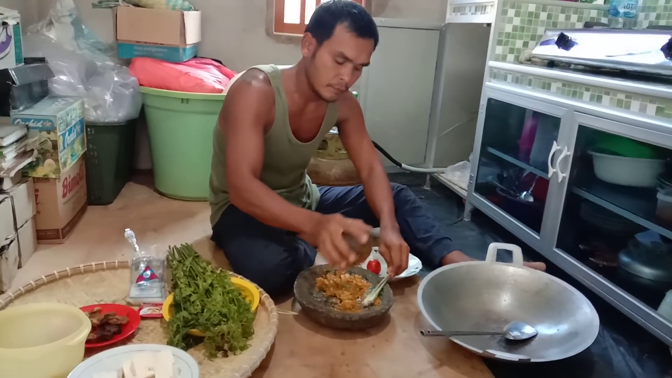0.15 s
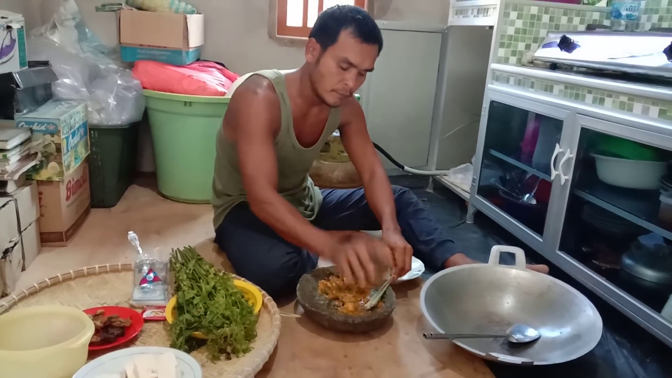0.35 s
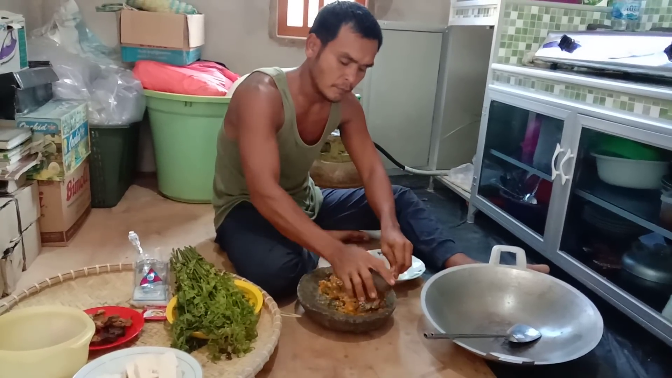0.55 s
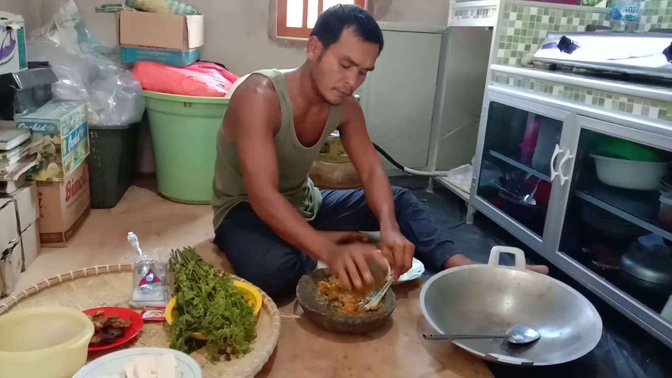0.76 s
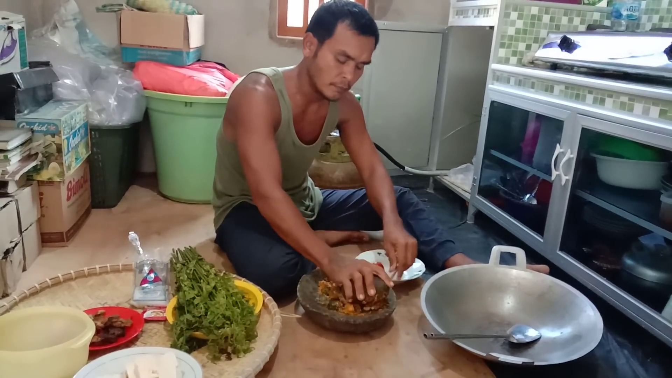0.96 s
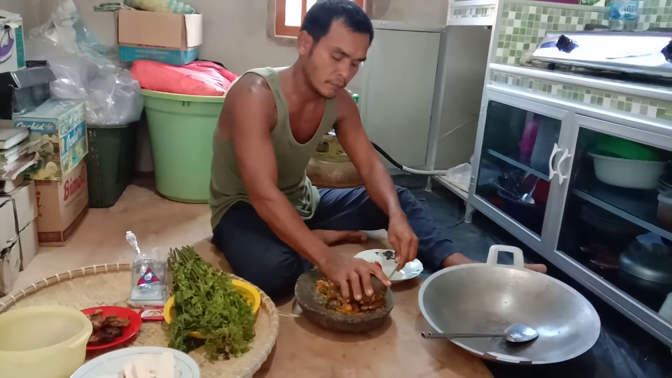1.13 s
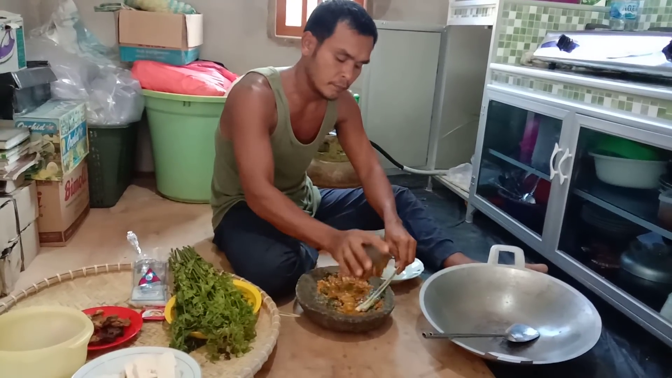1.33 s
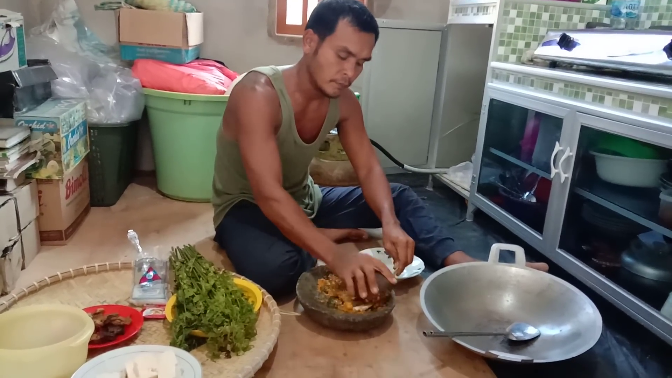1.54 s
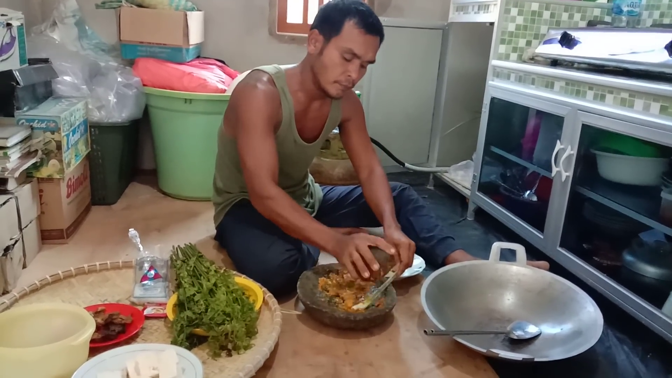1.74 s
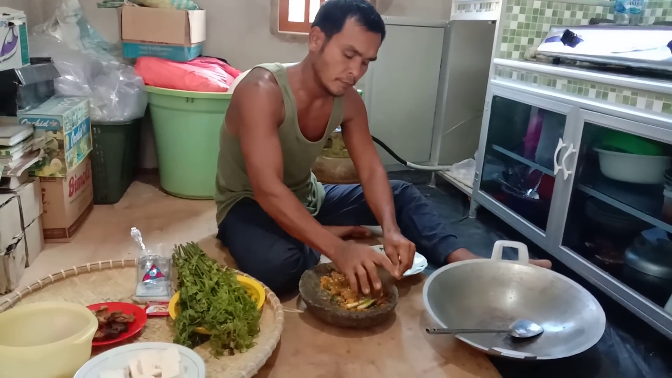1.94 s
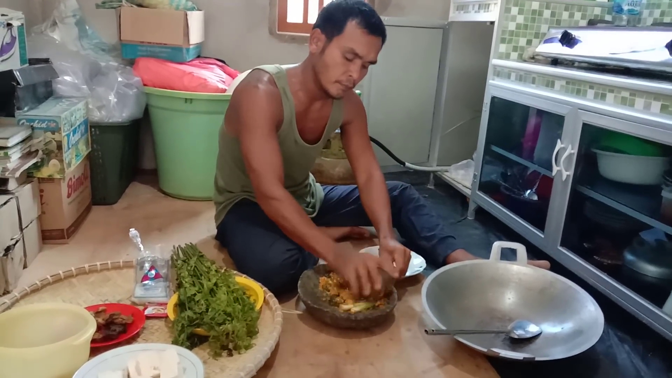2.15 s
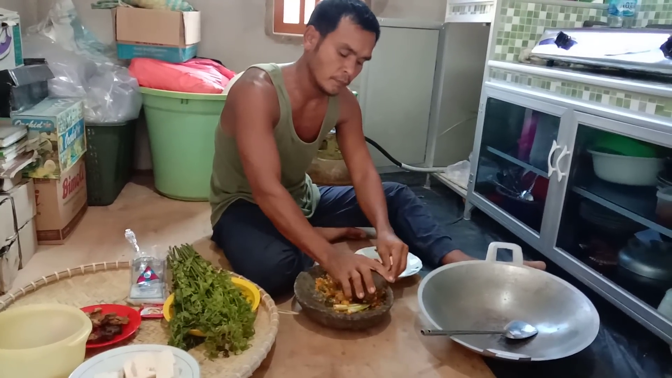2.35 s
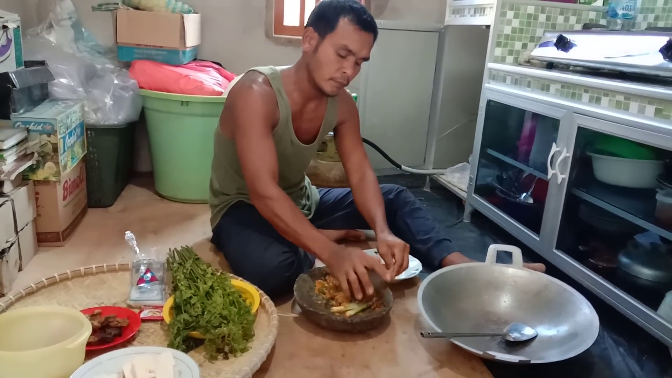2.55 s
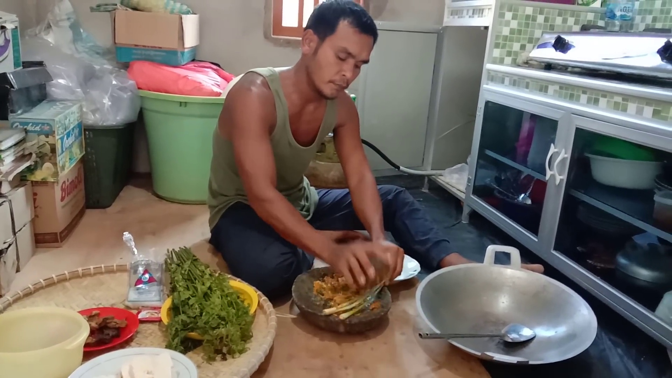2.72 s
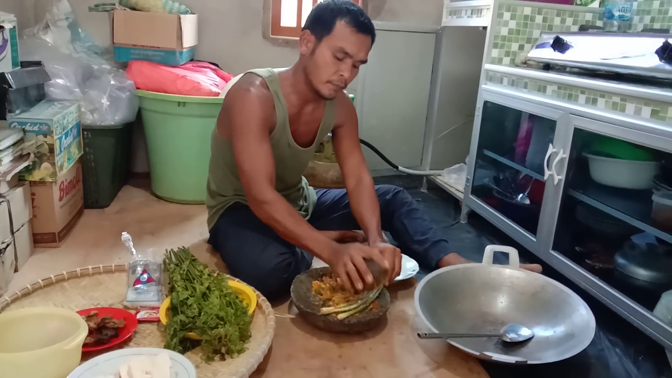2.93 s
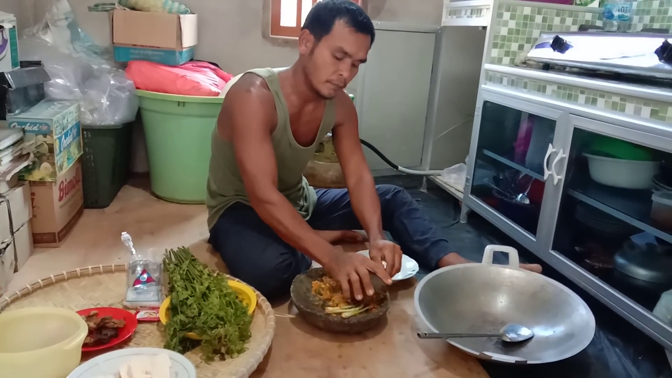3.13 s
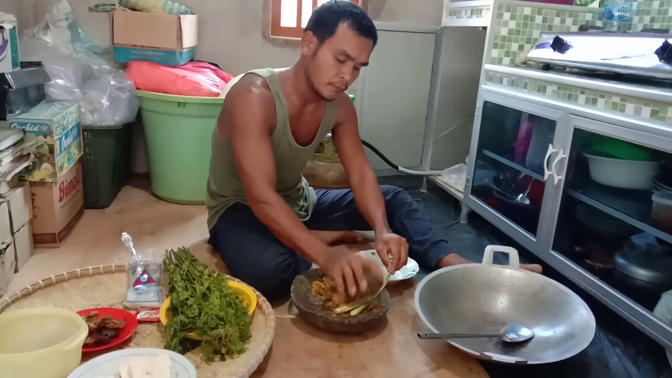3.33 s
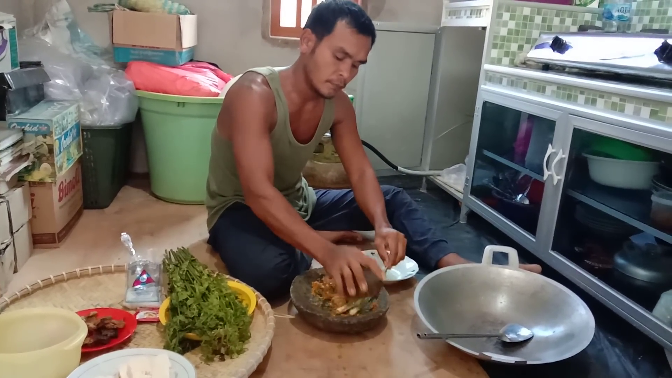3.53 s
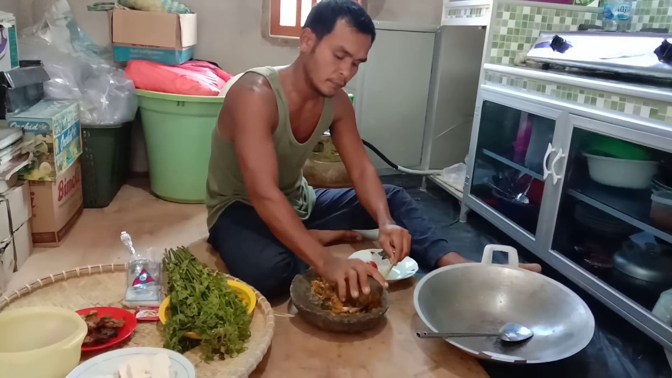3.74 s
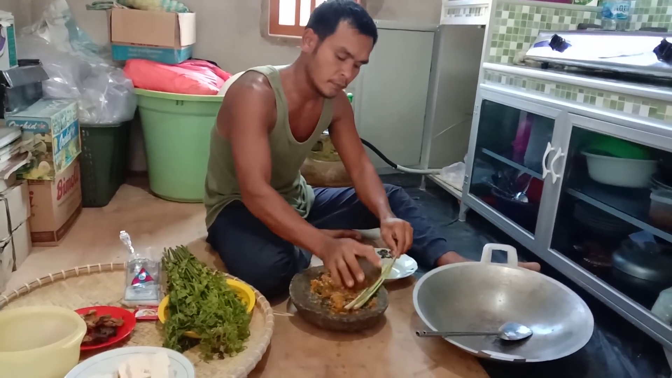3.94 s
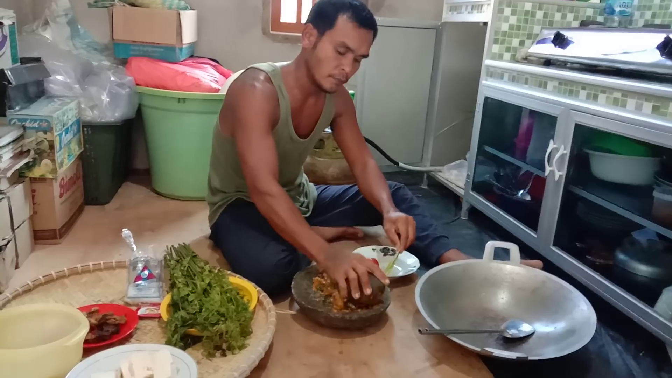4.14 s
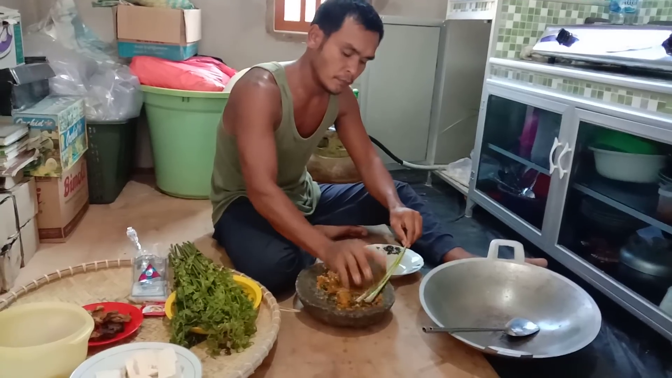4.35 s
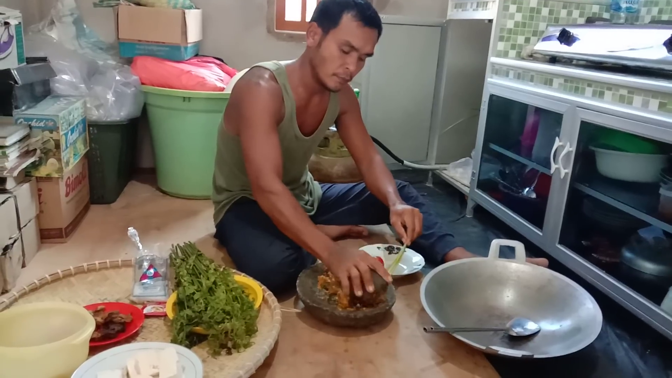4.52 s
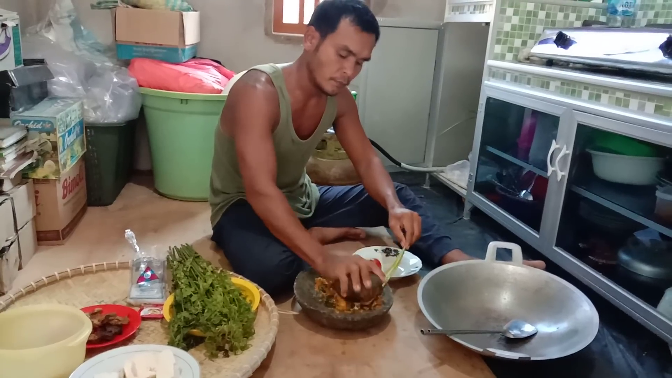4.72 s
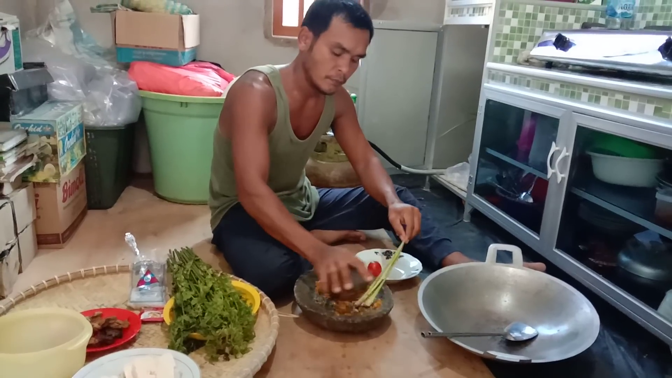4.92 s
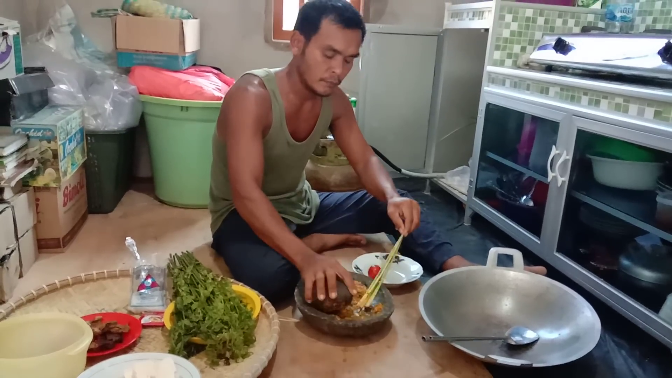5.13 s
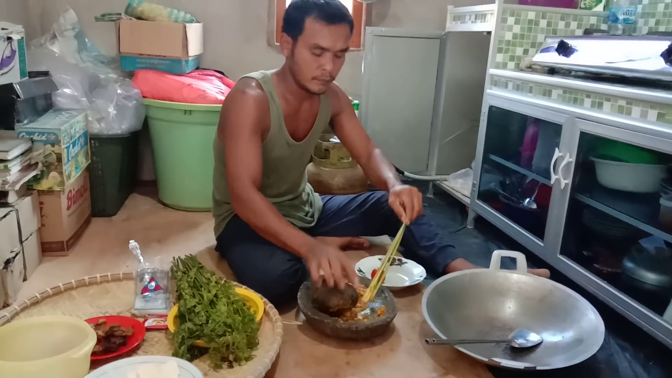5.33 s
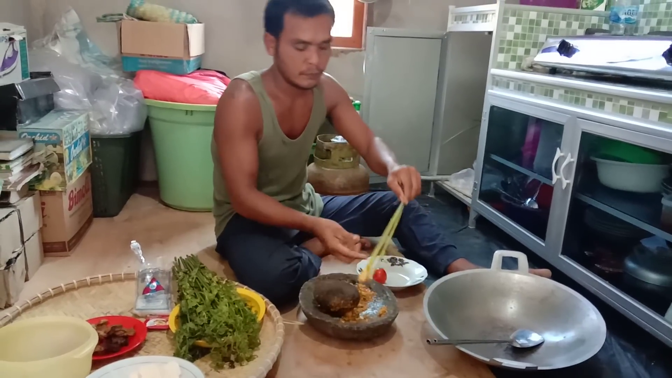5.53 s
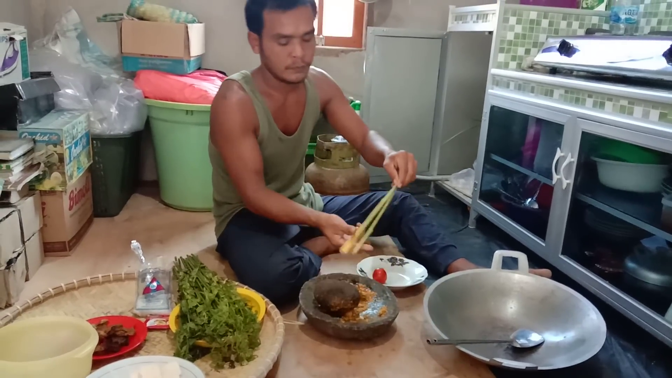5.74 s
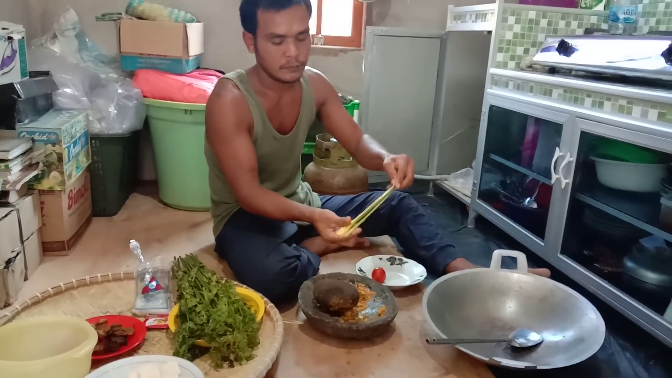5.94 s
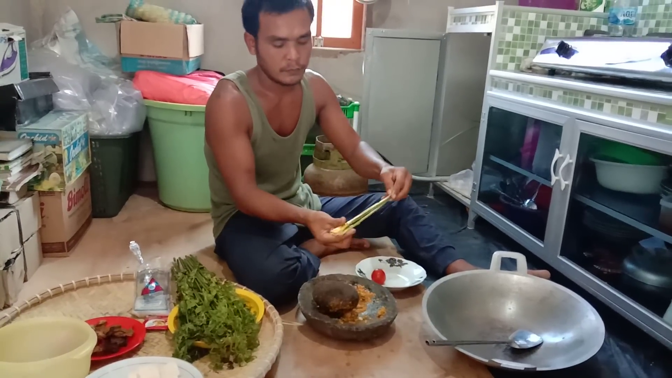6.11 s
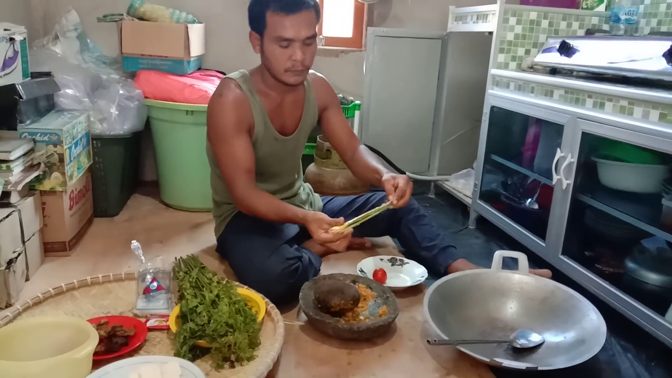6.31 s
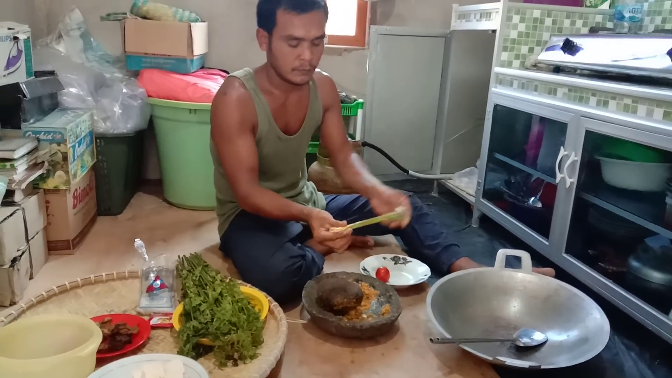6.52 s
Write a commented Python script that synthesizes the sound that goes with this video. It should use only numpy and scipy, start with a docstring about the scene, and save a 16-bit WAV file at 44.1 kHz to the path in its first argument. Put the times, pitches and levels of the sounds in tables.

```python
"""In a hard-walled kitchen, a stone pestle pounds stalks and wet spice paste in a stone mortar on the floor.
Each blow is shaped noise: a low thud, a ring through the stone's resonances, a crack of fibres and a fine spray.
Rebounds tap and a skid grinds, the pestle is laid down, grains of noise make hands rustle, snap and squeak.
Decaying noise bands form the room tail, low resonances the floor's rumble, steady noise the room tone.
A small microphone with gain control flattens the start of every tail."""
import sys
import numpy as np
from scipy import signal
from scipy.fft import rfft, irfft
from scipy.io import wavfile
from scipy.ndimage import uniform_filter1d

SR = 44100
rng = np.random.default_rng(int(sys.argv[2]) if len(sys.argv) > 2 else 0)


def field_ratio(decibels):
    """Amplitude ratio for a level in dB (20 dB per decade); scalars and array-likes work."""
    return 10 ** (np.asarray(decibels, dtype=float) / 20)


def output_pcm(signal):
    """Save a mono or channel-first signal as 16-bit PCM at the path in sys.argv[1].

    Samples are clipped to [-1, 1] before scaling.
    """
    pcm = np.clip(np.atleast_2d(signal).T, -1, 1) * 32767
    wavfile.write(sys.argv[1], SR, np.round(pcm).astype(np.int16))


N = 294265  # length [samples]


def rms_one(x):
    """Normalisation: scales a signal to unit rms."""
    return x / np.sqrt(np.mean(x ** 2) + 1e-20)


def at_hz(points, hz):
    """Logarithmic frequency axis: interpolates a table of (frequency, value) along it."""
    table_hz, values = np.array(points).T
    return np.interp(np.log(hz), np.log(table_hz), values)


def band(x, low_hz, high_hz):
    """Band-pass filtering: a Butterworth filter keeps one part of the spectrum."""
    return signal.sosfilt(signal.butter(2, [low_hz, high_hz], "band", fs=SR, output="sos"), x)


def colour(x, points, size=4096):
    """Minimum phase: folding the cepstrum gives the causal filter of a given magnitude response."""
    hz = np.arange(size // 2 + 1) * SR / size + 1  # the offset avoids log(0)
    cepstrum = irfft(np.log(field_ratio(at_hz(points, hz))))
    cepstrum[1:size // 2] *= 2
    cepstrum[size // 2 + 1:] = 0
    impulse_response = irfft(np.exp(rfft(cepstrum)))
    return signal.fftconvolve(x, impulse_response)[:N]


def resonate(x, modes):
    """Modal superposition: two-pole resonators in parallel, with alternating signs."""
    out = 0
    for k, (hz, width_hz, level_db) in enumerate(modes):
        r = np.exp(-np.pi * width_hz / SR)  # pole radius: a wider mode decays faster
        a = [1, -2 * r * np.cos(2 * np.pi * hz / SR), r * r]
        b = [(1 - r * r) / 2, 0, (r * r - 1) / 2]
        out = out + (-1) ** k * field_ratio(level_db) * signal.lfilter(b, a, x + 1e-18)
    return out


def clicks(times, levels_db):
    """Impulsive excitation: one single-sample impulse at each time."""
    out = np.zeros(N)
    out[(np.asarray(times) * SR).astype(int)] = field_ratio(levels_db)
    return out


def bursts(times, levels_db, rise_s, fall_s):
    """Rough contact: noise that swells and falls exponentially, with the energy of an impulse."""
    t = np.arange(2000) / SR
    shape = np.exp(-t / fall_s) * (1 - np.exp(-t / rise_s)) ** 2
    shape = shape / np.linalg.norm(shape)
    return signal.fftconvolve(clicks(times, levels_db), shape)[:N] * rng.standard_normal(N)


def contact(times, levels_db, rise_s, fall_s, sharp_db=-12):
    """Direct and radiated sound: row 0 is a rough burst with a sharp edge, row 1 impulses for the room."""
    edge = field_ratio(sharp_db) * clicks(np.asarray(times) + rise_s, levels_db)
    return np.array([bursts(times, levels_db, rise_s, fall_s) + edge, clicks(times, levels_db)])


# Blows of the pestle; the four parts are relative to the blow: (time [s], level of the blow [dB],
# thud [dB], stone ring [dB], crack [dB], spray [dB])
BLOWS = [(0.365, -6, -12, -14.5, -14, -39), (0.426, -15, -13.5, -17, -15.5, -31),
         (0.777, -12, -7, -9, -13.5, -33.5), (1.43, -7.5, -11.5, -16.5, -16, -35.5),
         (1.796, -11.5, -11, -14, -9.5, -21.5), (2.125, -5.5, -17.5, -27, -18.5, -24),
         (2.735, -9, -14.5, -21, -14, -23), (3.041, -6, -21, -2, -23, -34.5),
         (3.364, -10, -14.5, -14, -18, -32.5), (3.69, -10.5, -10.5, -11, -16.5, -48),
         (4.045, -19, -4, -6.5, -11, -14.5), (4.386, -14.5, -7.5, -9.5, -15.5, -22),
         (4.708, -7.5, -15, -18, -23.5, -33)]
# Resonances of the mortar: (frequency [Hz], width [Hz], level [dB])
STONE_MODES = [(790, 130, -10), (1228, 40, 0), (1270, 40, 0), (1250, 10, -5), (1560, 150, -11),
               (2030, 220, -13), (2380, 70, -6), (2750, 110, -10), (3190, 120, -17), (3990, 60, -15),
               (4390, 70, -22)]
# Resonances of the boards under the mortar: (frequency [Hz], width [Hz], level [dB])
FLOOR_MODES = [(104, 26.7, -14), (216.2, 31, -4.5), (232.7, 25, -2), (377.7, 15, 2.5), (671, 18, -4.5)]


def pestle():
    """Impact excitation: soft paste gives the thud, bare stone the ring, breaking fibres crack and spray."""
    s, peak_db, thud_db, ring_db, crack_db, spray_db = np.transpose(BLOWS)
    push = contact(s, peak_db + thud_db, 0.0006, 0.0075)
    thud = field_ratio(37.5) * band(push, 110, 1062) + field_ratio(39.0) * resonate(push, FLOOR_MODES)

    knock = contact(s, peak_db + ring_db, 0.0024, 0.0033, sharp_db=-4.5)
    ring = field_ratio(47.5) * resonate(band(knock, 710, 1900), STONE_MODES)
    ring = ring + field_ratio(29.5) * band(knock, 625, 4400)

    snap = contact(s, peak_db + crack_db, 0.00022, 0.0028)
    crack = field_ratio(34.0) * band(snap, 2210, 8170) * field_ratio([[-1.5], [0]])

    spit = contact(s, peak_db + spray_db, 0.001, 0.0035)
    spray = field_ratio(30.5) * band(spit, 7000, SR * 3 / 8) * field_ratio([[-6], [0]])
    spray = spray + field_ratio(6.5) * band(spray, 7800, 9100)  # wet paste spits most here

    # the stalks start to crush a moment before stone meets stone; direct sound only
    crush = field_ratio(20) * band(bursts(s - .007, peak_db + thud_db, 0.0077, 0.0072), 1500, 7600)
    return thud + ring - crack + spray + crush * [[1], [0]]


# The pestle is dropped into the paste: (time [s], level [dB])
LAID_DOWN = [(5.061, -16.5)]
# Resonances of its duller knock: (frequency [Hz], width [Hz], level [dB])
LAID_MODES = [(845, 1050, -15), (1410, 293, 5.5), (2000, 200, -29), (2220, 190, -34), (3020, 210, -11.5),
              (4370, 130, -19), (1500, 13, 2)]


def laid_down():
    """Damped impact: the pestle dropped into paste excites mostly broad resonances."""
    s, level_db = np.transpose(LAID_DOWN)
    drop = contact(s, level_db, 0.00085, 0.0063)
    return field_ratio(34.5) * resonate(band(drop, 390, 4540), LAID_MODES) + field_ratio(14) * band(drop, 100, 1000)


# The mortar rocks and taps the floor: (time [s], level [dB])
REBOUNDS = [(0.468, -18.5), (1.514, -22.5), (1.84, -13.5), (2.177, -11.5), (2.21, -22.5), (2.756, -16.5),
            (2.785, -9), (2.818, -23)]


def rebounds():
    """Secondary impacts: short dry taps of the rocking bowl excite the stone's resonances."""
    s, level_db = np.transpose(REBOUNDS)
    tap = contact(s, level_db, 0.00089, 0.0014) * field_ratio([[1.5], [-8]])
    tap = band(tap, 640, 3100)
    return field_ratio(27.0) * band(tap, 680, 1500) + field_ratio(35.5) * resonate(tap, STONE_MODES)


# Level curve of the pestle skidding over bare stone: (time [s], level [dB])
GRIND = [(3.049, 1.5), (3.062, -21), (3.075, -7), (3.094, -19.5), (3.17, -21.5), (3.194, -24.5),
         (3.21, -29.5), (3.34, -40.5)]


def skid():
    """Frictional excitation: random grit impulses keep all the stone's modes sounding."""
    s, level_db = np.transpose(GRIND)
    hit = rng.random(N) < 1500 / SR  # 1500 grains a second on average
    size_db = 2.1 * np.minimum(rng.exponential(1, N), 3.0)
    grit = hit * field_ratio(size_db) * rng.choice([-1, 1], N)
    ringing = rms_one(resonate(band(grit, 1200, 3700), STONE_MODES))
    scrape = rms_one(band(band(grit, 1300, 7000), 1500, 7900))
    curve = field_ratio(np.interp(np.arange(N) / SR, s, level_db, left=-120, right=-120))
    return (ringing + field_ratio(-10.5) * scrape) * curve * field_ratio([[-1.5], [-6]])


# Hand strokes on stalks and paste; rise and fall are times over 20 dB: (time of the height [s],
# rise [s], fall [s], rub [dB], rustle [dB], crackle [dB])
STROKES = [(0.002, 0.018, 0.1, -46, -56, -62), (.138, 0.022, 0.023, -55, -84, -66),
           (.315, .04, .05, -78, -80, -73.5), (.65, .12, .15, -57, -51.5, -61),
           (1.118, 0.0084, 0.059, -58, -56, -48.5), (1.231, 0.088, 0.058, -61, -50.5, -61),
           (1.35, 0.17, .1, -89, -80, -64), (1.771, 0.15, 0.041, -44, -44, -50.5),
           (2.33, 0.059, 0.033, -47, -66, -56), (2.43, 0.073, .08, -68, -49, -59),
           (2.52, 0.019, 0.1, -77, -57, -59), (2.72, 0.18, 0.015, -45, -47, -50),
           (3.585, 0.029, 0.41, -72, -49.5, -67), (5.04, 0.12, .03, -55, -56, -62),
           (5.601, .05, 0.17, -67, -70, -86), (5.719, 0.043, .16, -72, -46, -74),
           (6.03, 0.035, .3, -71.5, -72.5, -85), (6.27, 0.075, 0.19, -65, -74, -77),
           (6.42, 0.13, 0.13, -69, -66, -73.5), (6.64, 0.17, 0.13, -48, -51, -58)]
# Hollows of hand and bowl: (frequency [Hz], width [Hz], level [dB])
RUB_MODES = [(1184, 160, -2), (1410, 160, 3), (2610, 140, 1.5), (3480, 56, -12.5), (4900, 88, -9),
             (6140, 470, -8.5), (516, 120, -18)]


def strokes():
    """Granular friction: dense grains of uneven size sound in three registers under each hand stroke."""
    rustle_start_hz, rustle_sag_hz_s = 4200, 3020  # the rustle dulls as a stroke goes on
    out = np.zeros(N)
    t = np.arange(N) / SR
    grains = [rng.standard_normal(N) * field_ratio(2.6 * rng.exponential(1, N)) for _ in range(4)]
    rub = rms_one(resonate(grains[0], RUB_MODES))
    crackle = rms_one(band(grains[1], 7400, 7900) + field_ratio(-17) * band(grains[0], 10000, 16000))
    centres = np.geomspace(2600, 6200, 9)  # narrow rustle bands [Hz]
    voices = [rms_one(band(grains[2 + k % 2], hz / 1.04, hz * 1.04)) for k, hz in enumerate(centres)]
    for s, rise_s, fall_s, rub_db, rustle_db, crackle_db in STROKES:
        now = slice(max(int((s - 2 * rise_s) * SR), 0), int((s + 2 * fall_s) * SR))
        swell = field_ratio(-20 * np.maximum((s - t[now]) / rise_s, (t[now] - s) / fall_s))
        centre_hz = rustle_start_hz - rustle_sag_hz_s * (t[now] - s + rise_s)
        centre_hz = np.maximum(centre_hz, centres[1])
        # a bell on the log frequency axis crossfades the bands
        rustle = sum(v[now] * np.exp(-(np.log(hz / centre_hz) / 0.32) ** 2) for v, hz in zip(voices, centres))
        out[now] += swell * field_ratio(rub_db) * rub[now]
        out[now] += swell * field_ratio(rustle_db) * rustle / 2
        out[now] += swell * field_ratio(crackle_db) * crackle[now]
    return out


# Single fibres snap: (time [s], level [dB], frequency [Hz])
TICKS = [(1.1164, -35.5, 7160), (2.519, -36, 6980), (2.5577, -34.5, 6900), (5.695, -56, 4390),
         (6.3802, -49, 6240)]


def snaps():
    """Brittle fracture: each snapping fibre is a short noise burst in a band about its frequency."""
    return sum(band(bursts([s], [level_db + 21.5], 0.00079, 0.0066), hz / 1.7, min(hz * 1.5, 16000))
               for s, level_db, hz in TICKS)


# Thin squeaks: (start [s], length [s], frequency [Hz], level [dB])
SQUEAKS = [(4.244, 0.1, 5030, -60), (5.554, 0.058, 5040, -61), (6.308, 0.071, 5030, -57.5)]


def squeaks():
    """Narrow-band resonance: noise in a sharp mode and a weaker, wider one below it."""
    out = np.zeros(N)
    t = np.arange(N) / SR
    for s, length_s, hz, level_db in SQUEAKS:
        swell = np.clip(1 - np.abs(2 * (t - s) / length_s - 1), 0, 1) ** .5
        modes = [(hz, 60, 0), (hz * .89, 150, -8)]
        out += field_ratio(level_db) * swell * rms_one(resonate(rng.standard_normal(N), modes))
    return out


# A low hollow sound dies away at the start: (frequency [Hz], width [Hz], starting level [dB])
FADING_HUM = [(290, 54, -54.5), (729, 40, -60)]


def fading_hum():
    """Exponential decay: noise in two low resonances falls steadily in dB."""
    fall_db = -95 * np.arange(N) / SR  # 95 dB a second
    return sum(field_ratio(level_db + fall_db) * rms_one(resonate(rng.standard_normal(N), [(hz, width_hz, 0)]))
               for hz, width_hz, level_db in FADING_HUM)


# Reverberation time of the kitchen: (frequency [Hz], time to fall 60 dB [s])
ROOM_T60 = [(60, 1), (160, 0.53), (420, 0.63), (1100, 0.52), (2900, 0.51), (7700, 0.38), (10500, 0.25),
            (13000, 0.35), (15500, 0.36)]
# Swells of the early tail from the nearest walls: (delay [s], level [dB])
ECHOES = [(0.009, 2), (0.031, 4), (0.06, 4.5)]


def kitchen(x, wet_db, build_s):
    """Diffuse reverberation: a tail builds up, swells and dies band by band; a farther room lingers."""
    t = np.arange(SR) / SR
    edges = 45 * 2 ** np.arange(0, 8.9, .5)  # half octaves [Hz]
    white = rng.standard_normal((2, SR))  # neighbouring bands take different noise
    tail = 0
    for k, (low, high) in enumerate(zip(edges, edges[1:])):
        fall_db = -60 * t / at_hz(ROOM_T60, np.sqrt(low * high))
        far_db = -24 - 14.0 * np.log2(1 + (low / 6500) ** 4) + 0.36 * fall_db  # duller and slower
        tail = tail + band(white[k % 2], low, high) * (field_ratio(fall_db) + field_ratio(far_db))
    swells_db = sum(level_db * np.exp(-((t - s) / 0.0054) ** 2) for s, level_db in ECHOES)
    build = 1 - np.exp(-(t / build_s) ** 2)
    return signal.fftconvolve(x, field_ratio(wet_db + swells_db) * tail * build)[:N]


def breaks_off():
    """Gain step: after the pounding the level drops by 6.5 dB within 12 ms and stays down."""
    return field_ratio(-6.5 * np.clip((np.arange(N) / SR - 5.40) / .012, 0, 1))


# The room's lowest modes, struck by every thud: (frequency [Hz], width [Hz], level [dB])
LOW_MODES = [(95, 1.9, 1), (77.4, 0.51, -8), (58.86, 3, -10), (138.2, 7.2, -6.5)]
# Weight shifts on the boards: (time [s], level [dB])
LEANS = [(3.25, -42.5), (5.031, -43.5)]


def rumble():
    """Low-frequency modal response: thuds strike the lowest modes and leave the floor shaking a while."""
    boom_db, shake_db, idle_db = 54.5, -29.5, -77.5  # struck modes and shaking re thud; rumble at rest
    shake_rise_s, shake_t60_s, lean_s = 0.065, 2.2, 0.038
    s, peak_db, thud_db = np.transpose(BLOWS)[:3]
    thuds = clicks(s, peak_db + thud_db)
    t = np.arange(2 * SR) / SR
    shake = field_ratio(shake_db - 60 * t / shake_t60_s) * (1 - np.exp(-t / shake_rise_s))
    shaking = signal.fftconvolve(thuds, shake)[:N]
    shaking += sum(field_ratio(db) * np.exp(-((np.arange(N) / SR - at_s) / lean_s) ** 2) for at_s, db in LEANS)
    floor = [(74.3, 5.3, 0.5), (103.0, 8.2, 4.5), (60, 8.1, 9), (111, 51, 0.0)]  # as LOW_MODES
    noise = rms_one(resonate(rng.standard_normal(N), floor))
    struck = field_ratio(boom_db) * resonate(thuds, LOW_MODES)
    return (struck + noise * shaking) * breaks_off() + field_ratio(idle_db) * noise


# Spectrum of the room tone: (frequency [Hz], relative level per hertz [dB])
ROOM_TONE = [(18, -47), (30, -37), (64, -7), (165, -18), (245, -14.5), (280, -18.5), (345, -10.5),
             (486, -26), (584, -19), (988, -19.5), (1430, -21), (3220, -19), (4300, -16), (5450, -20.5),
             (16000, -29)]


def room_tone():
    """Stationary background noise: white noise shaped to the spectrum of the quiet room."""
    return field_ratio(-68.5) * rms_one(colour(rng.standard_normal(N), ROOM_TONE))


# Colour of the microphone: (frequency [Hz], response [dB])
MIC = [(30, -25.5), (70, 4.5), (2000, -2), (6000, -6.5), (6600, -10.5), (7100, 0), (8200, -7.5),
       (9000, -16), (11000, -11.5), (12000, -13.5), (13600, -11), (14500, -7.5), (15300, 1.5), (16500, -20)]


def microphone(x):
    """Frequency response: the microphone weights the spectrum as a minimum-phase filter."""
    return colour(x, MIC)


def scene():
    """Superposition: direct sound, the room's answer and room tone pass the microphone; rumble is added."""
    direct, radiated = pestle() + laid_down() + rebounds() + skid()
    hands = strokes() + snaps() + squeaks() + fading_hum()
    pounding = (direct + kitchen(radiated, wet_db=-30.5, build_s=0.0073)) * breaks_off()
    near = pounding + hands + kitchen(hands, wet_db=-35.5, build_s=0.007)
    return (microphone(near + room_tone()) + rumble())[None]


def gain_control(x, knee_db, squeeze, release_db_s, attack_s):
    """Dynamic compression: levels above the knee are pressed down fast and let up at a steady rate."""
    t = np.arange(N) / SR
    level_db = 10 * np.log10(uniform_filter1d(x ** 2, size=96) + 1e-12)
    held_db = np.maximum.accumulate(level_db + release_db_s * t) - release_db_s * t
    cut_db = np.clip(squeeze, 0, 1) * np.maximum(held_db - knee_db, 0)
    r = np.exp(-1 / (attack_s * SR))
    return x * field_ratio(-signal.lfilter([1 - r], [1, -r], cut_db))


def band_limit(x):
    """A steep low-pass at the top of the band."""
    return signal.sosfilt(signal.butter(12, 16820, fs=SR, output="sos"), x)


def record(dry):
    """Nonlinear transfer: gain control first, then saturation rounds the peaks."""
    x = gain_control(dry[0], knee_db=-21.5, squeeze=0.58, release_db_s=129.5, attack_s=0.002)[None]
    mix = 1.029 * np.tanh(x / 0.83)
    return band_limit(mix)


dry = scene()
out = record(dry)
output_pcm(out)
```